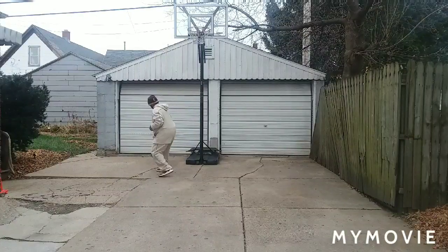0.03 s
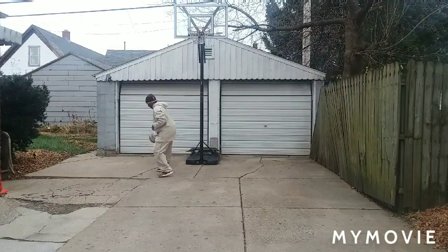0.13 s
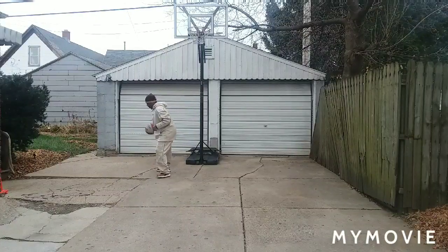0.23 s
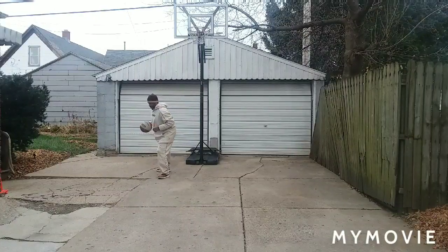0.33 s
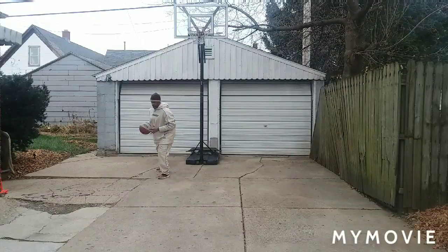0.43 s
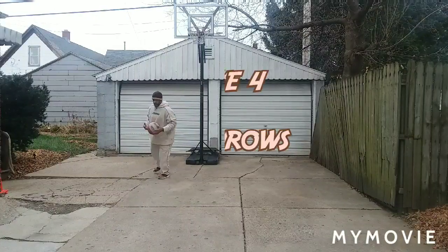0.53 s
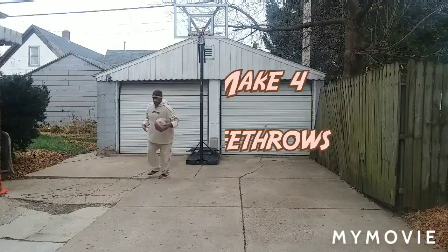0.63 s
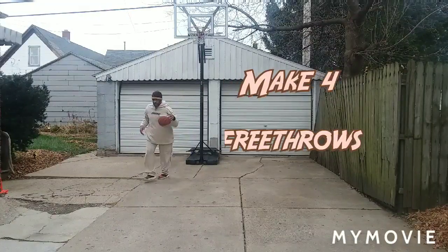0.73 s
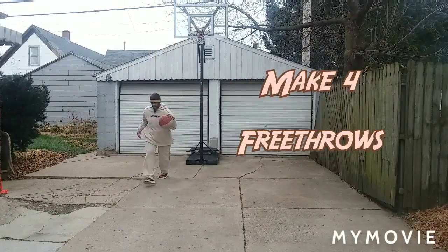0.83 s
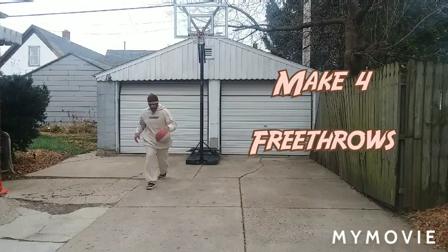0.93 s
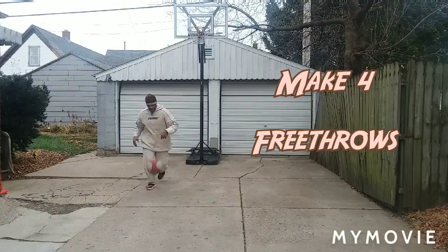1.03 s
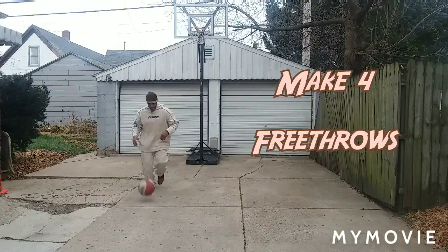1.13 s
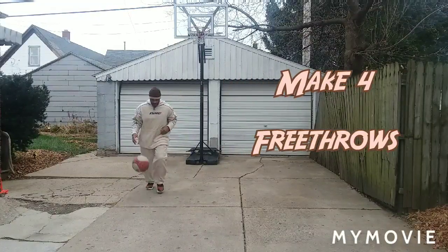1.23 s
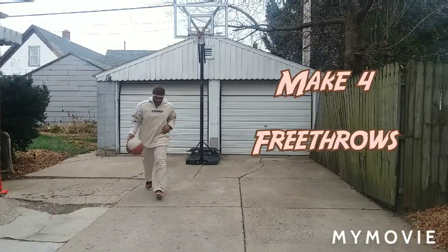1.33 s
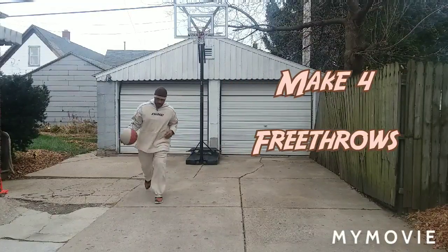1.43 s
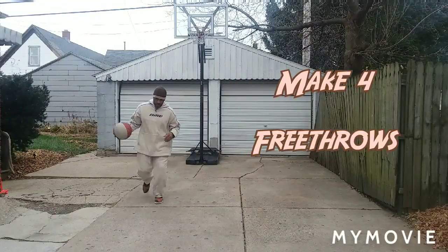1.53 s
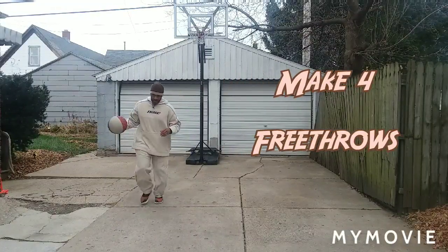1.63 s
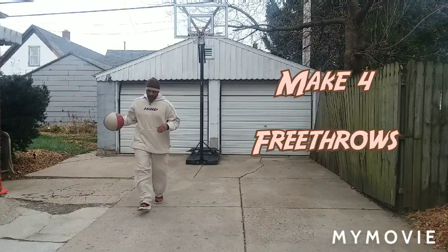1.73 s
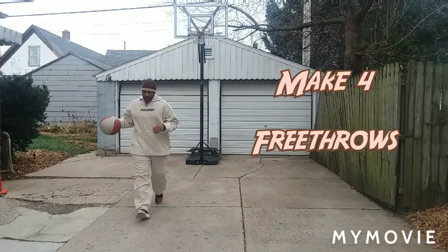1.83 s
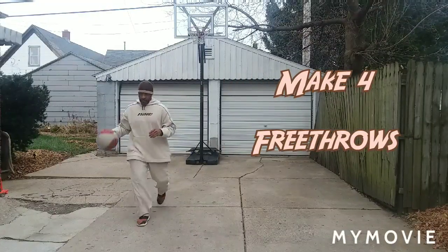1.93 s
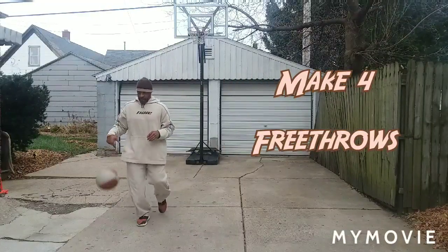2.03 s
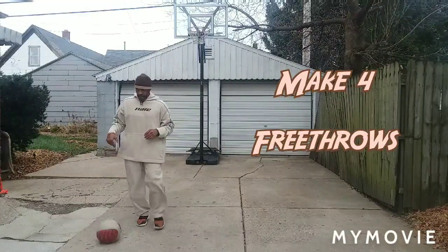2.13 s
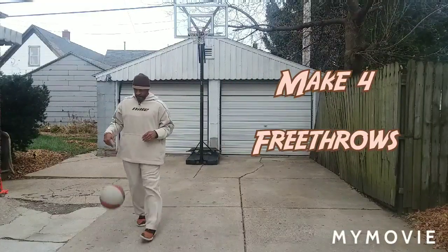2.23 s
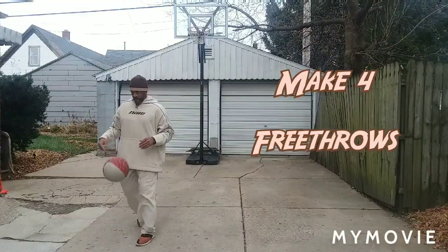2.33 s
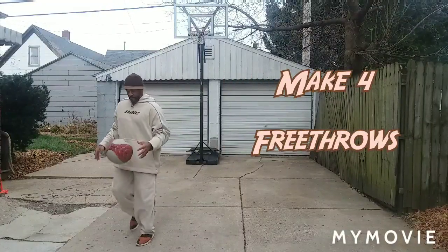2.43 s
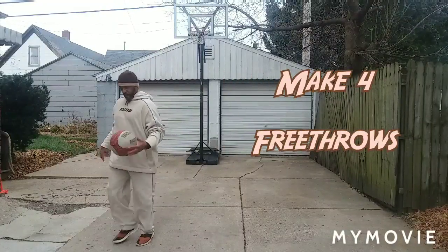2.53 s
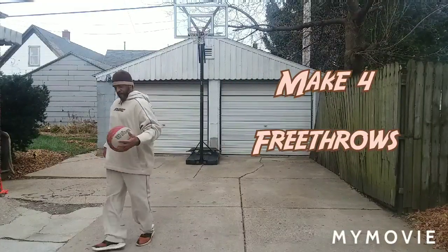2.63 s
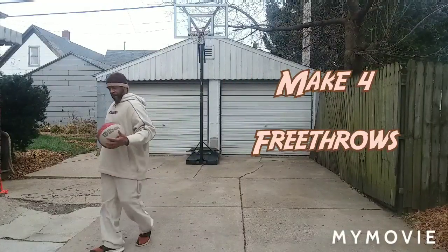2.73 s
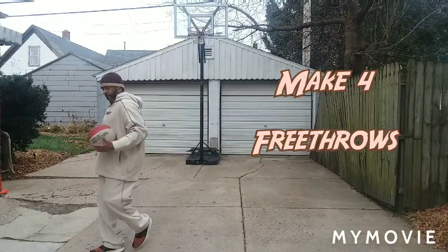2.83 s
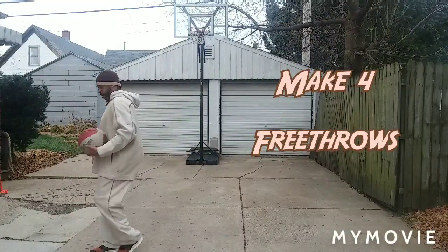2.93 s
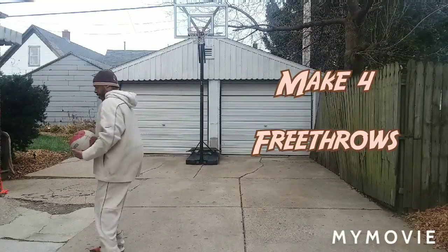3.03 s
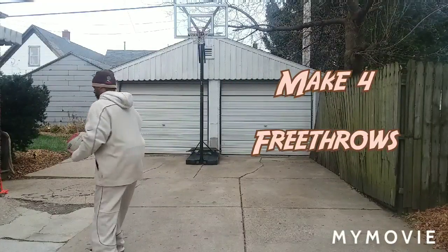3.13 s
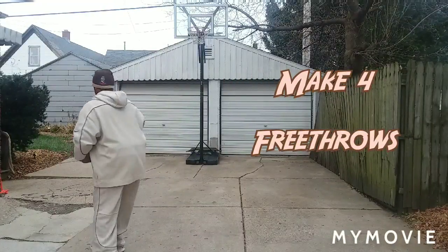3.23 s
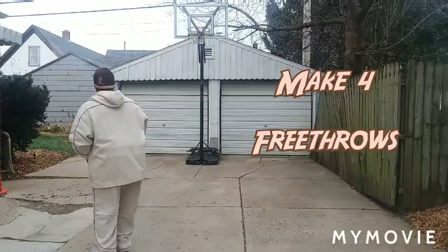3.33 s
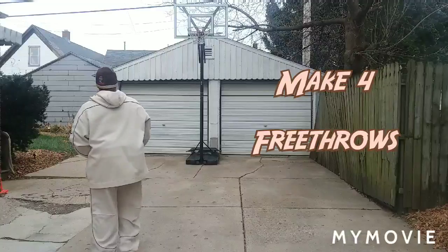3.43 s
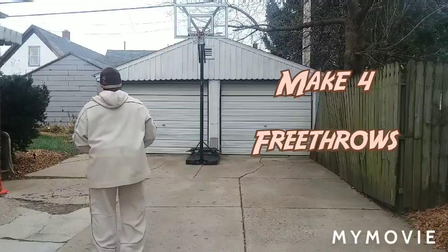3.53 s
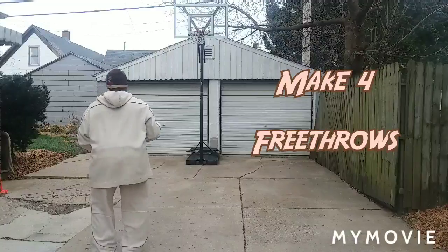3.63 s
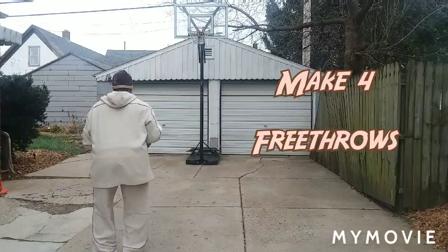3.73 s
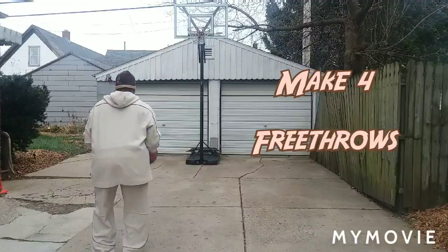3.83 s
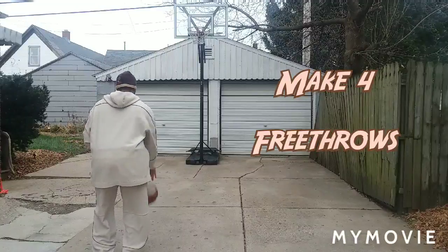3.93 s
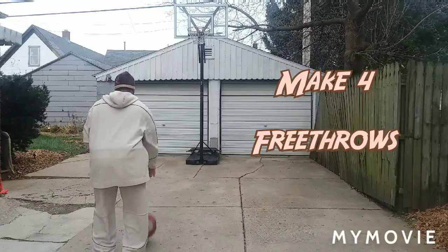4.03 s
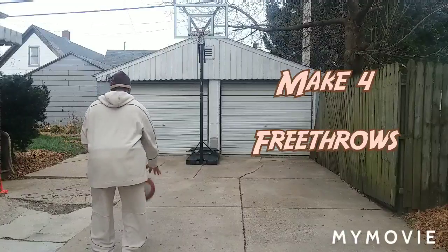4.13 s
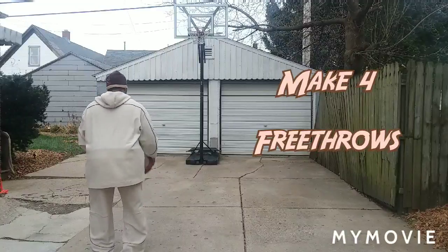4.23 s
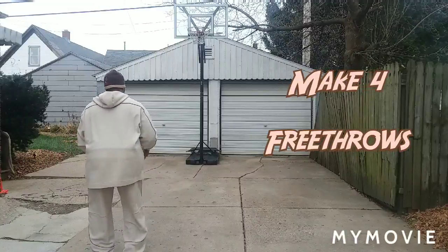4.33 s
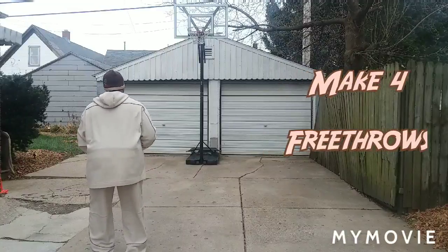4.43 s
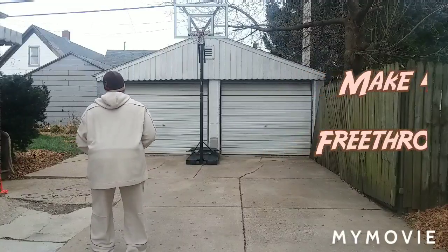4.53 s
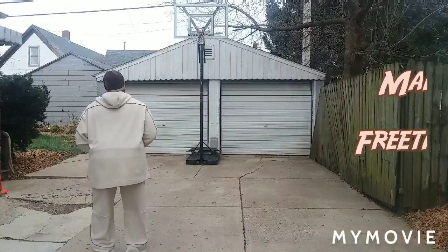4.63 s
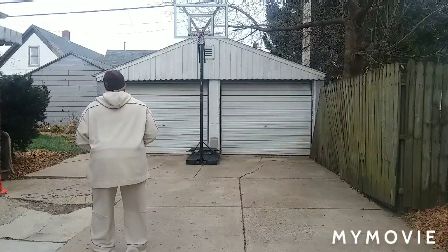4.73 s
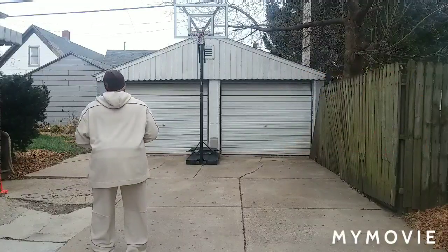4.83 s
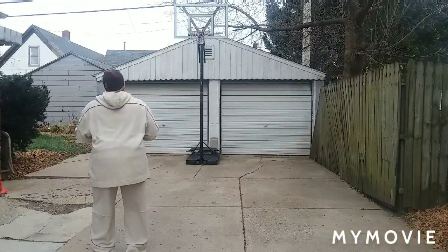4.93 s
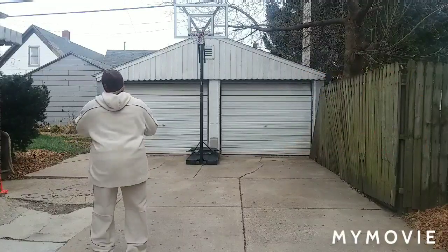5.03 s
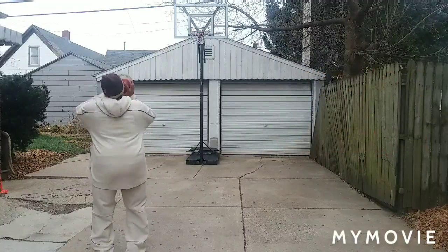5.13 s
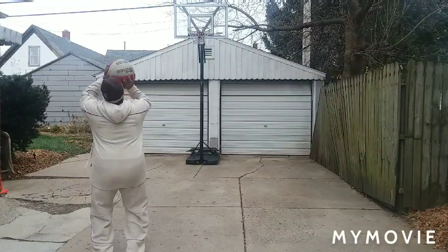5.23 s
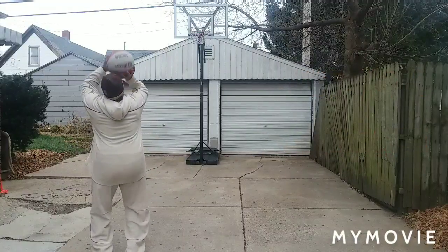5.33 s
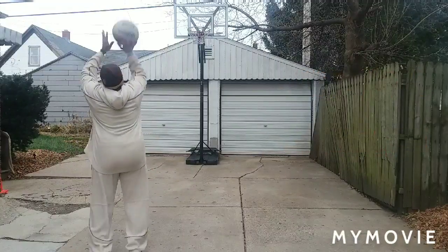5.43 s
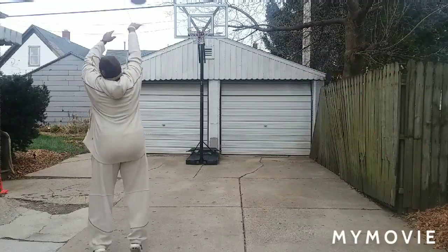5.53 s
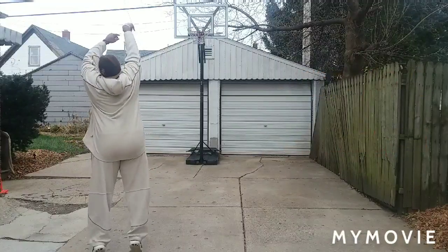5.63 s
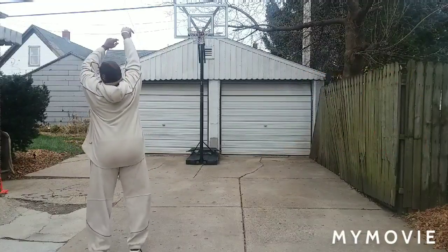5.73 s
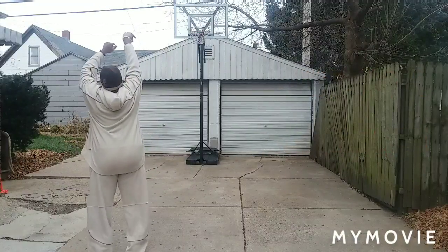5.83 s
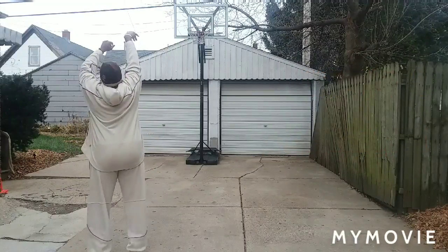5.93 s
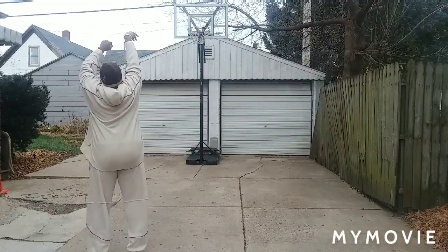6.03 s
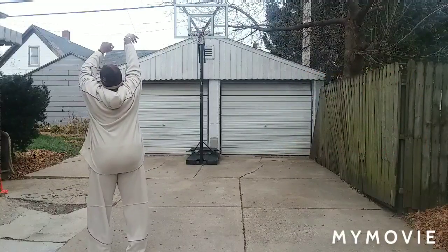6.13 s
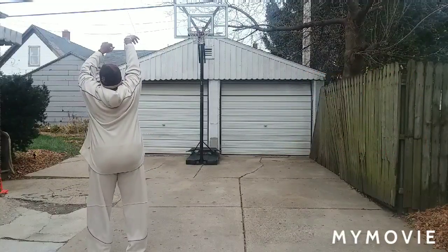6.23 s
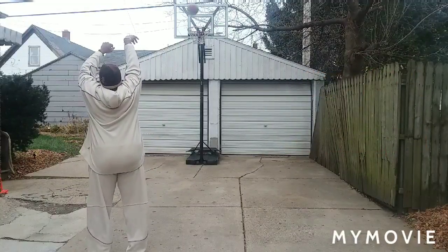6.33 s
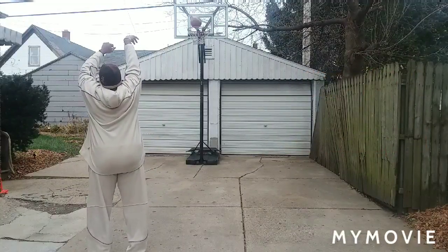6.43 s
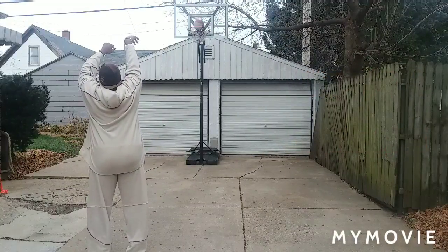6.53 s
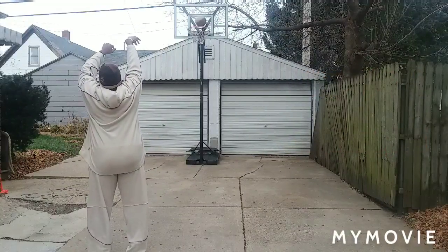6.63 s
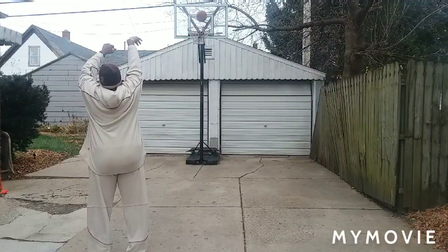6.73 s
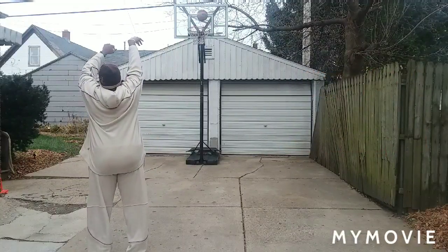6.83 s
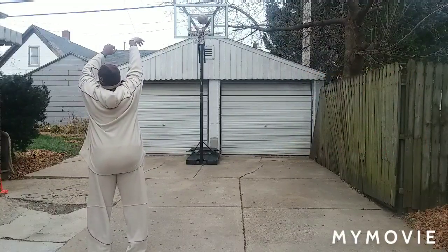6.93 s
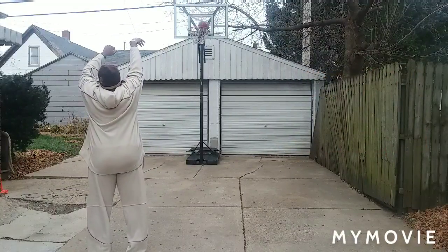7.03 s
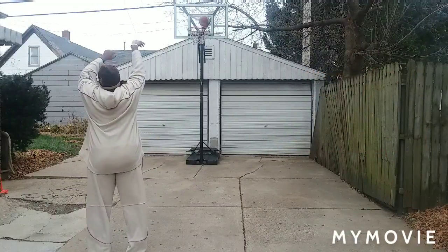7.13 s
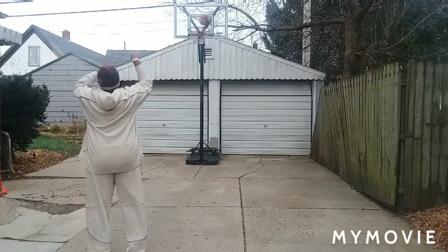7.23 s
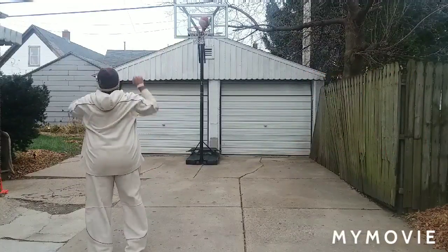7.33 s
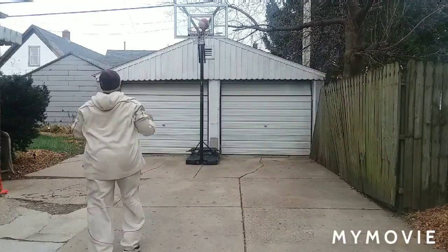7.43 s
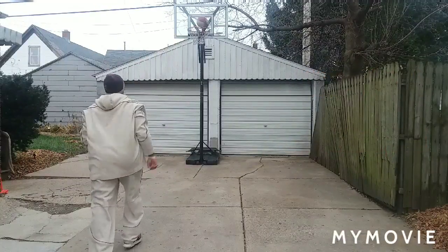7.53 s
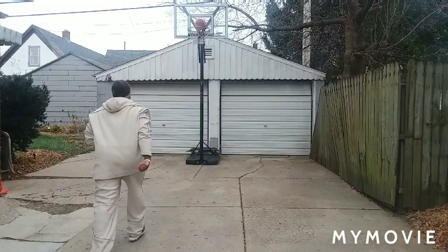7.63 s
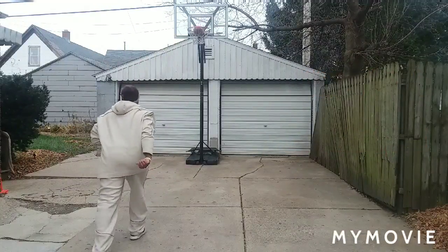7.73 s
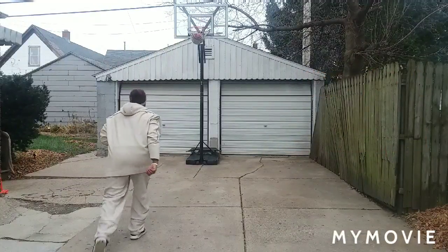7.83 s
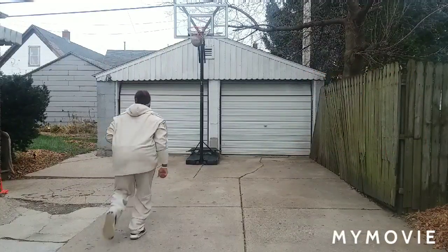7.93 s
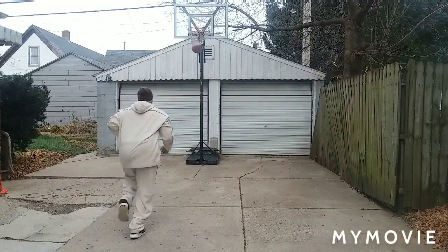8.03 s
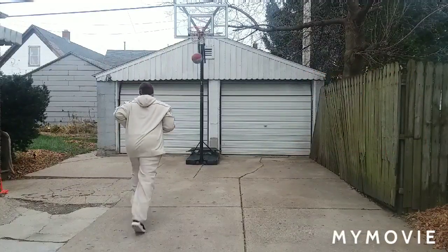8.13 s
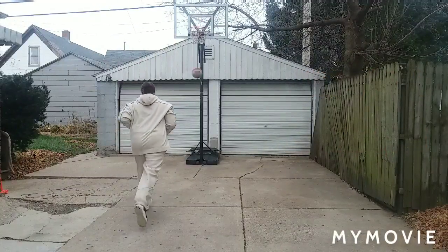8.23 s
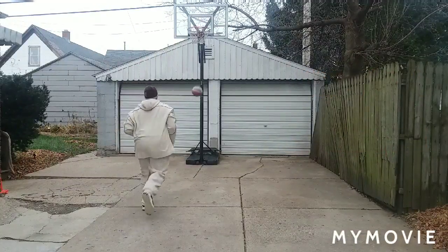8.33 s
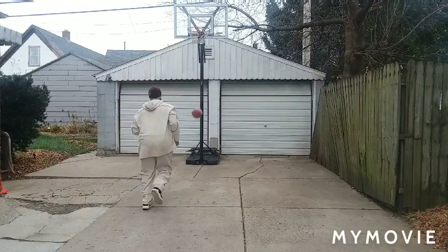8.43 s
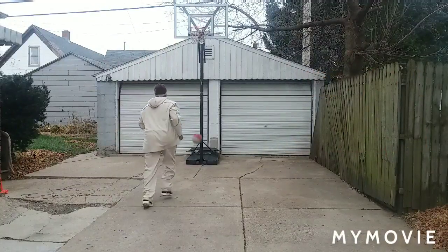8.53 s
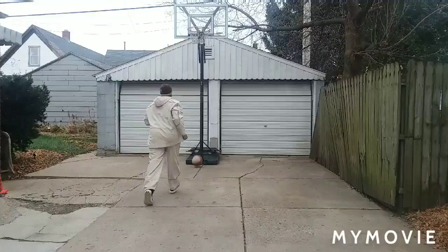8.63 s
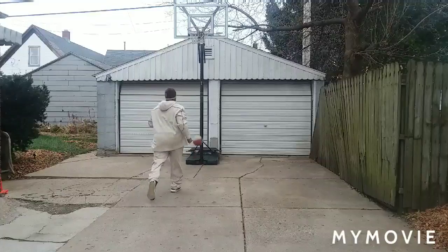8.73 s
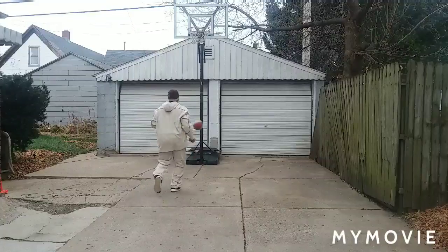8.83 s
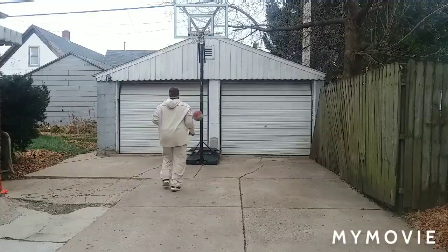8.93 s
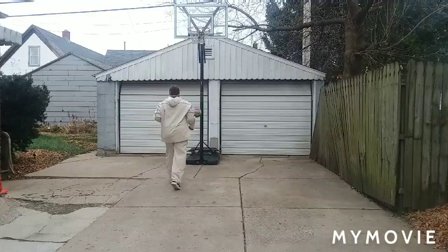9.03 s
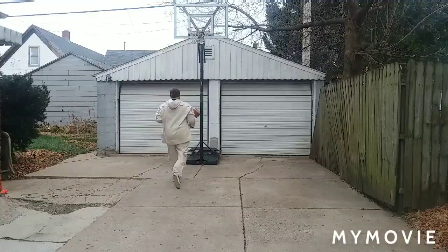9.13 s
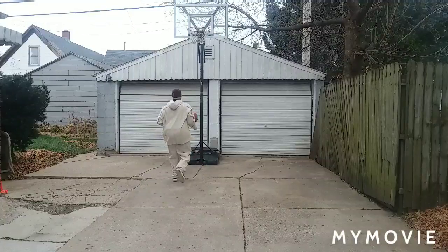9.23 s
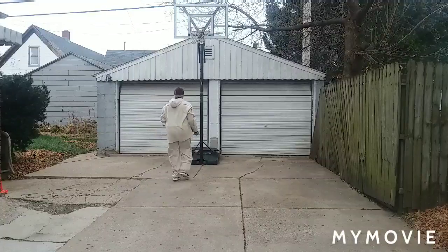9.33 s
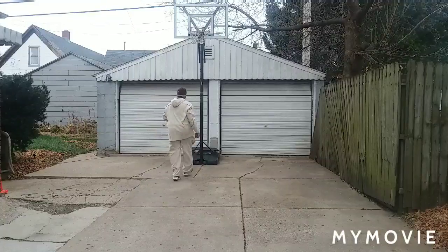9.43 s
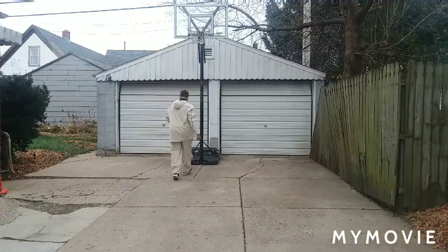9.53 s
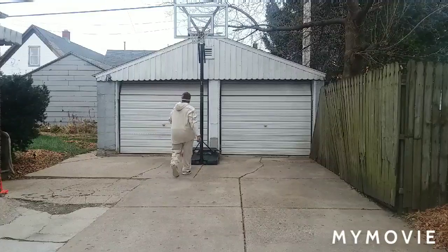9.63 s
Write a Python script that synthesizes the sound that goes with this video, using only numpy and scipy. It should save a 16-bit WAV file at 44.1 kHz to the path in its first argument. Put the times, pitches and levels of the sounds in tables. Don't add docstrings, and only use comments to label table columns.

```python
import sys
import numpy as np
from scipy import signal
from scipy.io import wavfile
from scipy.ndimage import uniform_filter1d

SR = 44100
rng = np.random.default_rng(int(sys.argv[2]) if len(sys.argv) > 2 else 0)


def ratio(d):
    e = np.asarray(d, float) / 20
    return 10 ** e


def dump_mix(stems):
    frames = np.atleast_2d(stems).T
    limited = np.clip(frames, -1, 1)
    pcm = np.round(limited * 32767).astype(np.int16)
    wavfile.write(sys.argv[1], SR, pcm)


N = 427329
T = np.arange(N) / SR

# (time [s], slap peak [dB], slap width [ms])
LANDINGS = [
    (-.008, -10, .08),
    (1.1260, -6.5, .08),
    (2.1443, -9.5, .085),
    (4.0232, -10, .09),
    (8.6520, -4, .08),
    (9.5972, -10.5, .13),
]


def unit(x):
    return x / np.sqrt(np.mean(x ** 2))


def logread(table, hz):
    points = np.array(table)
    return np.interp(np.log(hz), np.log(points[:, 0]), points[:, 1])


def band(x, lo_hz, hi_hz):
    edges_hz = [lo_hz, min(hi_hz, SR * .49)]
    return signal.sosfilt(signal.butter(2, edges_hz, "bandpass", fs=SR, output="sos"), x)


def hiss(lo_hz, hi_hz, size=N):
    return unit(band(rng.standard_normal(size), lo_hz, hi_hz))


def walk(rate, size=N):
    levels = rng.standard_normal(int(size * rate / SR) + 2)
    knots = uniform_filter1d(np.repeat(levels, 4), 4)
    return 1.25 * np.interp(np.arange(size) * rate * 4 / SR, np.arange(len(knots)), knots)


def curves(table):
    s, *columns = np.transpose(table)
    return [np.interp(T, s, c, left=c[0] - 60, right=c[-1] - 60) for c in columns]


def swells(table):
    return sum(db * np.exp(-((T - s) / half) ** 2) for s, db, half in table)


def add(out, s, x):
    i = int(s * SR)
    x = x[max(-i, 0):len(out) - i]
    out[max(i, 0):max(i, 0) + len(x)] += x


def fade(t, t60, rise_ms):
    return (1 - np.exp(-t * 1000 / max(rise_ms, .1))) * np.exp(-np.log(1000) * t / t60)


def blows(table):
    power = 0
    for s, db, t60, rise_ms in table:
        power = power + (ratio(db) * fade(np.maximum(T - s, 0), t60, rise_ms)) ** 2
    return np.sqrt(power)


def rings(modes, t, rise_ms, scale=1, detune=.015):
    out = 0
    for f, db, t60 in modes:
        hz = f * scale * (1 + detune * rng.standard_normal())
        out = out + ratio(db) * fade(t, t60, rise_ms) * np.sin(2 * np.pi * hz * t)
    return out


def glints(table):
    out, t = np.zeros(N), T[:SR // 25] - .015
    for s, db, hz, length_ms in table:
        bell = np.exp(-(t * 1000 / length_ms / np.where(t < 0, 1, 1.4)) ** 2)
        add(out, s - .015, ratio(db) * bell * np.sin(2 * np.pi * hz * t))
    return out


def ball_contact(t, slap_db, slap_ms, skin_db, thump, squash):
    # (frequency [Hz], level [dB], t60 [s])
    skin_modes = [(684, -5.5, 0.065), (950, 0.5, 0.03), (1250, 2, 0.0186), (2060, 17, 0.0033),
                  (2320, -14.5, 0.1), (4280, -9, 0.012)]
    # (multiple of thump pitch [1], level [dB], t60 [s])
    thump_modes = [(.68, -13, .12), (1, 9.5, 0.14), (1.5, -5.5, 0.35), (2, 3, 0.061), (2.7, -26, 0.051)]
    thump_db, thump_hz = thump
    squash_db, squash_hz = squash
    slap = -np.exp(-((t - .0005) * 1000 / slap_ms) ** 2)
    hit = ratio(slap_db) * (slap + 0.29 * hiss(1300, 4600, size=len(t)) * fade(t, 0.011, 0.84))
    hit += ratio(skin_db) * rings(skin_modes, t, 0.7)
    mirror = band(hit, 1870, 12000)[:SR // 8]
    mirror /= np.abs(mirror).max()
    hit += ratio(squash_db) * rings([(squash_hz, 0, 0.031)], t, 0.93)
    hit += ratio(thump_db) * rings(thump_modes, t, 20, scale=thump_hz)
    hit += ratio(thump_db - 4) * hiss(84, 116, size=len(t)) * fade(t, 0.23, 18)
    return hit, mirror


def yard_tail(t, tilt_db):
    # (frequency [Hz], level [dB per Hz])
    yard_colour = [(59, -31), (100, -1), (143, -9), (197, 0.5), (340, -14), (502, -15), (648, -23.5),
                   (784, -19.5), (1170, -22.5), (1580, -26), (2420, -19), (3120, -22.5), (4290, -27),
                   (16000, -57)]
    # (frequency [Hz], t60 [s])
    yard_decay = [(200, 0.24), (1000, 0.35), (2500, 0.27), (6000, 0.26), (14000, 0.11)]
    tail = 0
    for hz in 150 * 2 ** np.arange(0, 7, .5):
        db = logread(yard_colour, hz) + 10 * np.log10(hz) + tilt_db * np.log2(hz / 1000)
        db = db + 2.5 * walk(160, size=len(t))
        noise = hiss(hz / 2 ** .25, hz * 2 ** .25, size=len(t))
        tail = tail + ratio(db) * noise * fade(t, logread(yard_decay, hz), 8)
    return tail / np.sqrt(np.mean(tail[:SR // 20] ** 2))


def add_flutter(hit, mirror, first_ms, trip_ms, echo_db, loss_db):
    size = SR // 8
    for trip in range(5):
        hz = 2270 + 800 / (1 + trip) ** 2
        planks = hiss(hz * .85, hz * 1.18, size=size) + .4 / (1 + trip) * hiss(4000, 10000, size=size)
        rattle = planks * fade(T[:size], 0.0097 * (1 + 0.32 * trip), 0.97)
        echo = rattle + ratio(3 - 4.3 * trip) * mirror
        add(hit, (first_ms + trip_ms * trip) / 1000, ratio(echo_db - loss_db * trip) * echo)


def bounces():
    # (yard tail [dB], skin ring [dB], thump [dB], thump pitch [Hz], door hum [dB])
    bodies = [(-27, -24, -18, 97.3, -45), (-30.5, -23, -46, 240, -42.5), (-29.5, -19.5, -23.5, 84, -60),
              (-27, -17.5, -12.5, 88, -46.5), (-27.5, -24, -14.5, 120, -44.5), (-33, -32, -27.5, 125, -40)]
    # (first echo [ms], round trip [ms], level [dB], loss per trip [dB])
    flutters = [(5, 13, -28, 10), (7.8, 29, -20.5, 17), (8.4, 15, -19.5, 18), (9.8, 20, -21, 9),
                (5.8, 8.1, -15, 15), (5.3, 15, -26, 9)]
    # (pumped air [dB], its pitch [Hz], yard tilt [dB per octave])
    squashes = [(-9, 100, 0), (-14.5, 184, 0), (-15.5, 223, 0), (-11, 204, -0.5), (-17, 170, 0.5),
                (-13, 175, -0.5)]
    out, t = np.zeros(N), T[:SR // 2]
    for landing, body, flutter, squash in zip(LANDINGS, bodies, flutters, squashes):
        s, slap_db, slap_ms = landing
        body_db, skin_db, thump_db, thump_hz, door_db = body
        squash_db, squash_hz, tilt_db = squash
        hit, mirror = ball_contact(t, slap_db, slap_ms, skin_db, (thump_db, thump_hz), (squash_db, squash_hz))
        add(hit, min(flutter[0], 10) / 1000 - .002, ratio(body_db) * yard_tail(t, tilt_db))
        add(hit, .03, ratio(door_db) * hiss(1750, 3150, size=len(t)) * fade(t, 0.68, 2.3))
        add_flutter(hit, mirror, *flutter)
        add(out, s - .0005, hit)
    return out


def cavity():
    # (frequency [Hz], level [dB], t60 [s])
    air_modes = [(724, -2.5, .24), (1180, -6, 0.26), (1770, -9, .2), (2300, -4.5, .25), (2730, -11, 0.11)]
    air_db = [-34.5, -38, -39, -30, -29, -35.5]
    out, t = np.zeros(N), T[:SR // 3]
    for (s, *_), db in zip(LANDINGS, air_db):
        for mode in air_modes:
            flutter = ratio(5.4 * walk(80, size=len(t)))
            add(out, s, ratio(db) * flutter * rings([mode], t, 5.3, detune=.004))
    return out


def panel_echoes():
    # (time [s], level [dB], frequency [Hz], length [ms])
    panels = [(.004, -41, 7300, 0.69), (.005, -28.5, 1020, 1.9), (.008, -21, 3450, 0.84),
              (.0117, -22, 2960, 1.2), (.0207, -25, 2800, 1.5), (.0232, -26.5, 1010, 2.3),
              (.0272, -25, 3080, 1.5), (.0352, -29, 2800, 2), (.0397, -37, 1020, 2.5),
              (1.1268, -16, 2000, 1.24), (1.1345, -38, 5830, 1.5), (1.1332, -23, 750, 1.6),
              (1.1395, -35, 1230, 1.7), (1.1475, -23, 2060, 1.4), (1.1539, -37, 2110, 2),
              (1.1544, -31, 780, 2.1), (1.1575, -33, 2600, 2), (1.1685, -27.5, 2410, 3),
              (1.177, -35, 2450, 2), (1.1869, -34, 2300, 2.5), (1.2073, -34, 2260, 2.5),
              (2.1557, -28, 2430, 1.7), (2.1565, -23, 1440, 2), (2.1664, -31, 715, 1.9),
              (2.1674, -30, 2460, 2), (2.1807, -27.5, 1120, 2.9), (2.1896, -32, 1040, 1.8),
              (2.2086, -36, 1180, 2.3), (4.034, -22, 2270, 1.6), (4.037, -25, 800, 2.5),
              (4.049, -32, 1980, 2.5), (4.0545, -40, 4250, 1.5), (4.0255, -18.5, 1050, 2),
              (8.656, -31, 725, 2.3), (8.67, -25.5, 280, 9), (8.6655, -16, 1190, 0.97),
              (8.6715, -26, 3300, 1), (8.6727, -23, 765, 2), (8.678, -34, 2700, 1.5),
              (8.6862, -38, 2300, 2), (8.7105, -46, 2300, 2), (9.604, -26, 190, 4.4),
              (9.603, -26, 2760, 1.4), (9.6115, -29, 855, 2.3), (9.6162, -27, 2480, 1.8),
              (9.617, -30, 1840, 2.8), (9.6314, -34, 2450, 1.5), (9.6327, -34, 1810, 2.5),
              (9.633, -25, 190, 3), (9.6035, -31, 4530, .7), (9.6539, -42, 2410, 2)]
    return glints(panels)


def hoop():
    # (time [s], level [dB], t60 [s], rise [ms])
    rim_blows = [
        (6.449, -34, 0.11, 4.3),
        (6.457, -23.5, 0.086, 4.4),
        (6.472, -33, 0.62, 4),
        (6.525, -40, 0.2, 2.7),
    ]
    net_blows = [
        (6.445, -28, 0.65, 22),
        (6.543, -33.5, 0.44, 4),
        (6.6, -36, 0.29, 8),
    ]
    board_blows = [
        (6.434, -35, 0.42, 9.7),
        (6.475, -32, 0.42, 7.4),
        (6.543, -46.5, 0.46, 3.1),
        (6.59, -40, 1, 12),
    ]
    # (frequency [Hz], width [Hz], level [dB])
    rim_modes = [(1360, 350, -19), (2340, 220, -4), (2495, 120, 2), (3500, 890, -12), (5100, 550, -10),
                 (7300, 600, -8.5)]
    # (time [s], level [dB], t60 [s], rise [ms])
    shakes = [
        (6.433, -38, 0.36, 6.3),
        (6.7233, -52, 0.25, 5.2),
        (6.734, -26, 0.12, 2.5),
        (6.821, -27.5, 0.17, 4.6),
        (6.912, -28.5, 0.12, 6),
        (7.0684, -39, 0.4, 5.4),
        (7.1305, -40.5, 0.37, 2.6),
    ]
    # (time [s], level [dB], frequency [Hz], t60 [s])
    tocks = [
        (7.069, -43, 1150, 0.07),
        (7.434, -37.5, 1350, 0.12),
        (7.8, -45, 1350, 0.2),
        (7.85, -46, 1200, 0.086),
        (8.246, -44, 900, 0.056),
    ]
    net = blows(net_blows)
    clicks = rng.standard_normal(N) * ratio(2.2 * walk(350))
    rim = unit(sum(ratio(db) * unit(band(clicks, hz - w / 2, hz + w / 2)) for hz, w, db in rim_modes))
    net_top = 0.5 * band(clicks, 9000, 12500) * (net / ratio(-28.0)) ** 0.36
    out = blows(rim_blows) * rim
    out += net * ratio(-8.5) * unit(band(clicks, 2500, 5600) + net_top)
    out += blows(board_blows) * hiss(200, 1900)
    stand = unit(hiss(154, 364) + 0.34 * hiss(430, 730) + 0.42 * hiss(50, 110))
    out += blows([(6.44, -24.5, 1, 59.7)]) * stand
    t = T[:SR // 3]
    size = len(t)
    add(out, 6.458, ratio(-18) * rings([(2500, 9, 0.055), (2375, -14, 0.2)], t, 2.5, detune=0))
    for s, db, t60, rise_ms in shakes:
        chain = .5 * hiss(1000, 3600, size=size) + hiss(3600, 4760, size=size)
        chain += .5 * hiss(5000, 7500, size=size) + 0.15 * hiss(8200, 13000, size=size)
        add(out, s, ratio(db - 17.5) * fade(t, t60, rise_ms) * chain)
    for s, db, hz, t60 in tocks:
        tock = hiss(hz * 0.63, hz * 1.09, size=size) + 0.14 * hiss(1500, 4000, size=size)
        add(out, s, ratio(db - 3.5) * fade(t, t60, 0.86) * tock)
    return out


def hoop_knocks():
    # (time [s], level [dB], frequency [Hz], length [ms])
    steel_knocks = [(6.453, -22, 2340, 2.4), (6.459, -33, 4840, 2), (6.471, -39, 5000, 2.3),
                    (6.476, -30, 2520, 2.3), (6.446, -39, 1190, 2), (6.488, -35, 2500, 2),
                    (6.499, -36, 2490, 3), (6.51, -32, 2430, 3), (6.521, -31, 2300, 3),
                    (6.5323, -27.5, 2560, 2.4), (6.538, -28, 2540, 1.7), (6.552, -39, 2450, 2),
                    (6.573, -36, 2550, 3), (6.582, -39, 3300, 2.7), (6.5954, -35, 2480, 2),
                    (6.5964, -37, 920, 2.8), (6.6016, -38, 2220, 2), (6.6121, -32, 1010, 2.2),
                    (6.6213, -38, 2610, 2), (7.0695, -38, 1250, 1), (7.133, -48, 2130, 2.8),
                    (7.4365, -35.5, 1270, 1.7), (7.441, -38, 950, 1.8)]
    return glints(steel_knocks)


def car():
    # (time [s], loudness as it nears and leaves [dB], exhaust turned to the yard [dB])
    drive = [(0, -50.5, -6), (.6, -50.5, 1.5), (1.4, -58, 10), (2.4, -42.5, -3.5), (2.8, -45.5, -7),
             (3.13, -40, -15.5), (3.45, -33.5, -5), (3.75, -30.5, -0.5), (4.1, -30.5, 8), (4.43, -28.5, -4),
             (5, -33.5, 5), (5.5, -38, 9), (6.2, -39, 11.5), (6.9, -40, 10.5), (7.5, -41, 9),
             (8.4, -44, 8.5), (8.98, -37, -1.5), (9.7, -54, 2)]
    # (time [s], firing rate [Hz])
    revs = [(0, 94.3), (.6, 97.4), (1.5, 105.2), (2.24, 112.8), (3.02, 124.5), (3.64, 136.4), (4.16, 146.8),
            (4.4, 121.5), (4.56, 114), (4.95, 124.5), (5.75, 131), (6.42, 132.7), (6.72, 136.8),
            (8.07, 133.7), (8.7, 133), (9.7, 121)]
    # (eighths of a firing above a firing multiple [1], level [dB])
    lumps = [(0, -1), (1, 2), (2, -8.5), (3, -9), (4, -3), (5, 0.5), (6, 1), (7, -1)]
    # (frequency [Hz], width [Hz], level [dB])
    street = [(82, 20, 5), (170, 40, -8), (201, 16, 4), (272, 20, 4), (305, 30, -6), (460, 40, 4)]
    # (time [s], boom [Hz], drone [Hz], sharpness left by scattering [0-1])
    resonances = [(0, 195, 335, .8), (.6, 196, 330, .8), (1.6, 212, 330, 1), (2.3, 227, 333, 1),
                  (2.6, 222, 330, 1), (3.2, 227, 337, 1), (3.55, 238, 358, 1), (3.93, 234, 376, 1),
                  (4.08, 200, 360, .7), (4.25, 211, 345, 1), (4.42, 197, 335, 1), (4.75, 196, 333, 1),
                  (5.25, 207, 336, 1), (5.65, 213, 350, 1), (6.3, 230, 368, .8), (6.7, 222, 320, .45),
                  (7.3, 205, 372, .45), (7.9, 220, 335, .6), (8.4, 235, 340, .45), (8.8, 198, 350, 1),
                  (9.2, 190, 340, .9), (9.7, 186, 335, .4)]
    # (time [s], level [dB], half length
    # [s])
    fades = [(.35, -10, 0.063), (4.42, -7, 0.041), (4.86, -7, 0.14), (5.64, -13, 0.14), (5.91, -14, 0.1),
             (6.52, -20, 0.048), (6.64, 2, .05), (7.21, -8.5, 0.066), (7.83, -8.5, 0.13),
             (8.15, -7.5, 0.088), (8.45, 4, 0.078), (8.8, -6, 0.042), (9.3, -6, 0.31)]
    # (time [s], level [dB], half length [s])
    drones = [(1.4, 7, 0.075), (3, 5, 0.51), (3.8, 4.5, .2), (4.9, 0, 0.39), (5.22, 3, 0.16),
              (7.1, 2.5, 0.45), (8.45, 6.5, 0.26), (9.35, -9, 0.54)]
    # (time [s], level [dB], half length [s])
    rumbles = [
        (.25, 7.5, 0.42),
        (.95, -10, 0.26),
        (1.72, -13, 0.29),
        (2.75, -22, 0.43),
        (3.5, -1.5, .3),
        (3.82, 8.5, 0.071),
        (4.95, 12.5, 0.12),
        (5.8, 10, 0.32),
    ]
    # (time [s], level [dB], half length [s])
    shades = [
        (2.45, -21, 0.14),
        (3.35, 5, 0.12),
        (3.92, -4, 0.076),
        (4.36, 3.5, 0.068),
        (4.82, 3.5, 0.13),
        (5.5, -0.5, 0.18),
        (5.9, 5, 0.079),
        (6.2, -3, 0.1),
        (7.6, -3.5, 0.07),
        (8.35, 2, 0.23),
    ]
    step = 16
    t = T[::step]
    loud_db, facing_db = (c[::step] for c in curves(drive))
    line_db = loud_db + facing_db + swells(fades)[::step]
    drone_db = -49 + 0.33 * (loud_db + 39) - 0.19 * facing_db + swells(drones)[::step]
    rumble_db = -45.5 + swells(rumbles)[::step]
    boom_db = loud_db + swells(shades)[::step]

    def drift(rate):
        return walk(rate * step, size=len(t))

    hz = np.interp(t, *np.transpose(revs))
    cycle = 2 * np.pi * np.cumsum(hz) * step / (8 * SR)
    boom_hz, drone_hz, sharp = (c[::step] for c in curves(resonances))
    far = np.clip((t - 7.3) / 0.91, 0, 1)
    out = 0
    for k in range(3, 30):
        f = k * hz / 8
        low, high = np.clip((f - 95) / 80, 0, 1), np.clip((f - 285) / 30, 0, 1)
        db = rumble_db * (1 - low) + boom_db * (low - high) + drone_db * high
        db = db - 4.5 * far * np.clip((f - 235) / 40, 0, 1) * (1 - high)
        db = db + lumps[k % 8][1] - 17.0 - 12 * np.clip((f - 380) / 100, 0, 1)
        db = db + sum(g / (1 + ((f - c) / w * 2) ** 2) for c, w, g in street)
        db = db + 7 * (1 - sharp) + 17 * sharp / (1 + ((f - boom_hz) / 11) ** 2)
        db = db + 15 * sharp / (1 + ((f - drone_hz) / 10) ** 2)
        if k == 8:
            db = line_db + 2.2 * drift(15)
        else:
            db = db + (2.16 + 3.46 * (1 - sharp)) * drift(5)
        phase = rng.uniform(0, 2 * np.pi) + (0.2 + .5 * far) * drift(11)
        out = out + ratio(db) * 2 ** .5 * np.sin(k * cycle + phase)
    for db, lo_hz, hi_hz in ((rumble_db - 2.0, 50, 100), (line_db - 9.0, 100, 160),
                             (boom_db - 12.0, 178, 310), (drone_db - 7.0, 295, 480)):
        out = out + ratio(db) * hiss(lo_hz, hi_hz)[::step]
    return signal.resample_poly(out, step, 1)[:N]


def shoes():
    # (time [s], level [dB], t60 [s], rise [ms])
    scuffs = [(0.2244, -63, 0.15, 4), (0.54, -48, 0.074, 8.6), (1.3704, -50, 0.2, 4.4),
              (2.578, -54, 0.22, 4), (3.0782, -54.5, 0.092, 3.5), (3.279, -55.5, 0.18, 4.9),
              (4.253, -60, 0.1, 4), (7.639, -51.5, 0.19, 2.1), (7.6532, -52.5, 0.093, 3.3),
              (7.736, -57, 0.19, 5.1), (7.784, -54.5, 0.35, 4.5), (7.8388, -56, 0.22, 4),
              (8.077, -58, 0.23, 5.1), (8.124, -56.5, 0.26, 4), (8.1762, -52, 0.15, 3.7),
              (8.247, -60, 0.17, 4), (8.5597, -62, 0.15, 4)]
    # (time [s], level [dB], t60 [s], rise [ms])
    skid = (8.5, -39.5, 2, 129)
    # (time [s], level [dB], frequency [Hz], t60 [s])
    heels = [
        (0.326, -20.5, 99, 0.033),
        (0.511, -22, 125, 0.062),
    ]
    out, t = np.zeros(N), T[:SR // 3]
    for s, db, t60, rise_ms in scuffs:
        grit = hiss(3500, 8500, size=len(t)) + .55 * hiss(8500, 15500, size=len(t))
        rough_db = db - 12.5 + 1.7 * walk(200, size=len(t))
        add(out, s, ratio(rough_db) * fade(t, t60, rise_ms) * grit)
    out += blows([skid]) * hiss(400, 730)
    for s, db, hz, t60 in heels:
        add(out, s - .01, ratio(db + 7.0) * fade(t, t60, 7.3) * np.sin(2 * np.pi * hz * t))
    return out


def town():
    # (frequency [Hz], level [dB per Hz])
    town_colour = [(18, -47), (30, -38.5), (95, -5.5), (121, -9), (157, -28.5), (215, 0), (280, -24),
                   (394, -5), (554, -13), (913, -11), (1760, -21), (3060, -24), (4080, -30.5),
                   (6380, -48.5), (16000, -61)]
    # (time [s], level [dB])
    traffic = [(0, -48), (.7, -53), (1.3, -52), (1.94, -44.5), (2.3, -47), (2.9, -49), (3.18, -49.5),
               (3.6, -47.5), (4.2, -47), (5.3, -54), (7.7, -55.5), (8.9, -59), (9.7, -62.5)]
    # (time [s], level [dB], half length [s])
    passes = [
        (1.0, 7.5, 0.63),
        (1.94, 16.5, .45),
        (2.75, 12.5, 0.51),
        (3.45, 8.5, 0.4),
        (6.8, 12, 0.25),
        (8.9, 4.5, 0.25),
    ]
    # (time [s], level [dB], half length [s])
    under = [(.4, -6, 0.28), (1.75, -3.5, .3), (5.3, 1, 0.44), (7.3, 6, .4)]
    # (time [s], level [dB], half length [s])
    tread = [(1.0, -1.5, .3), (1.62, -4, .15), (1.95, -0.5, 0.23), (2.6, 3.5, 0.48), (4.4, -4, 0.64)]
    # (time [s], level [dB], half length [s])
    bright = [(.5, 2.5, 1), (1.4, 0.5, 0.6), (2.7, -0.5, 0.28), (7.1, 3.5, .3), (9.3, -3, 0.27)]
    roar_db = curves(traffic)[0]
    mean_db = roar_db.mean()
    high_db = -84.5 + swells(passes)
    surge = walk(9.9)
    out = np.zeros(N)
    for hz in 35 * 2 ** np.arange(0, 8.9, 1 / 3):
        share = np.clip(np.log2(hz / 4200) / .5, 0, 1) * np.clip(np.log2(11000 / hz) / 0.68, 0, 1)
        swell = (roar_db - mean_db) * (hz < 4200) - 9 * (hz < 110)
        swell = swell + surge * (600 < hz < 2000) + (high_db + 82.0) * share
        if 400 < hz < 3000:
            swell = swell + swells(under if hz < 750 else tread if hz < 1400 else bright)
        db = logread(town_colour, hz) + 10 * np.log10(hz) + swell + 1.9 * walk(9)
        out += ratio(db) * hiss(hz / 2 ** (1 / 6), hz * 2 ** (1 / 6))
    steady = band(out / ratio(roar_db - mean_db), 500, 3600)
    return ratio(mean_db) * out / np.sqrt(np.mean(steady ** 2))


def chirp(hz, drop):
    t = T[:SR // 16]
    return np.hanning(len(t)) * np.sin(2 * np.pi * np.cumsum(hz * (1 - drop * t)) / SR)


def sparrows(count=500):
    # (time [s], start pitch [Hz], level [dB], fall [share of pitch per s])
    calls = [(4.69, 6260, -68.5, 2.5), (5.17, 4220, -55, 1.5), (5.24, 3330, -55, 1.5),
             (5.43, 4040, -53, 1.36), (5.47, 3370, -55, 1.3), (5.65, 5940, -68.5, 3),
             (5.8, 3650, -46.5, 2.4), (5.87, 3220, -52, 1.6), (6.0, 5700, -71, 1), (6.3, 3180, -56, 1.6),
             (7.816, 4160, -63, 0.39), (8.29, 4560, -60, 3.7), (8.325, 3940, -57, 3.3),
             (8.345, 4200, -61, 0.26), (8.37, 3500, -60, 3), (8.41, 3300, -64, 2), (8.57, 5600, -68, 2),
             (8.91, 4270, -68, 0.18), (8.98, 4270, -67, .2), (9.235, 5750, -70, 2.1),
             (9.51, 5600, -69, 2.7)]
    # (time [s], level [dB], half length [s])
    lulls = [
        (0, 5, 0.23),
        (2, 4.5, 0.13),
        (2.9, -15, 0.41),
        (6.85, 4, 0.26),
        (8.4, -13, 0.35),
        (9.55, -12, 0.35),
    ]
    flock, near = np.zeros(N), np.zeros(N)
    for when, pitch, drop, size in rng.random((count, 4)):
        note = chirp(3700 + 1800 * pitch ** 2, 2 + 4 * drop)
        add(flock, when * N / SR, ratio(6 * size - 14 * pitch) * note)
    for s, hz, db, drop in calls:
        add(near, s, ratio(db + 3 * walk(300, size=SR // 16)) * chirp(hz, drop))
    t = T[:SR // 3]
    far_smear = rng.standard_normal(len(t)) * fade(t, .3, 3)
    near_smear = far_smear * fade(t, 0.48, 0.96)
    flock = signal.fftconvolve(flock, far_smear / np.sqrt(np.sum(far_smear ** 2)))[:N]
    near = signal.fftconvolve(near, near_smear / np.sqrt(np.sum(near_smear ** 2)))[:N]
    bed = unit(band(hiss(2800, 4600), 2800, 4600))
    return (unit(flock) + bed) * ratio(-54 + swells(lulls) - 8) + near


def scene():
    ball = bounces() + cavity() + panel_echoes()
    basket = hoop() + hoop_knocks()
    return (ball + basket + car() + shoes() + town() + sparrows())[None]


def roll_off(x):
    return signal.sosfilt(signal.butter(12, 15830, fs=SR, output="sos"), x)


def record(dry):
    # (frequency [Hz], width [Hz], level [dB])
    ports = [(2510, 440, -0.5), (4120, 830, 1.5), (7380, 1500, 4)]
    x = signal.sosfilt(signal.butter(3, 52, "highpass", fs=SR, output="sos"), dry)
    x = x + sum((ratio(db) - 1) * band(x, hz - w / 2, hz + w / 2) for hz, w, db in ports)
    x = signal.lfilter(*signal.butter(1, 15000, fs=SR), x)
    x = x + ratio(-81.5) * hiss(13000, 23000)
    return roll_off(x)


dry = scene()
out = record(dry)
dump_mix(out)
```